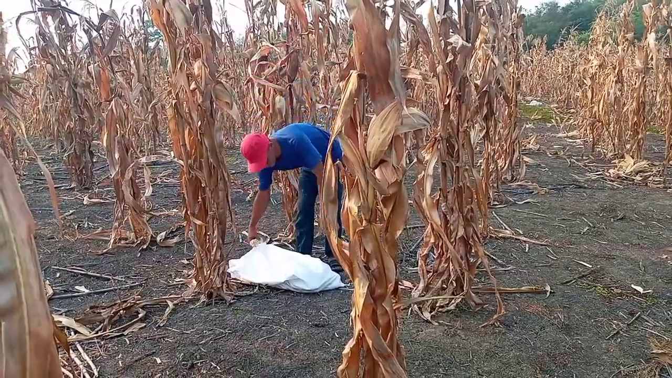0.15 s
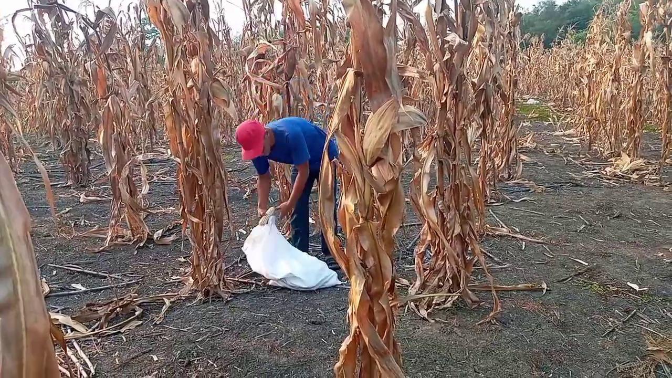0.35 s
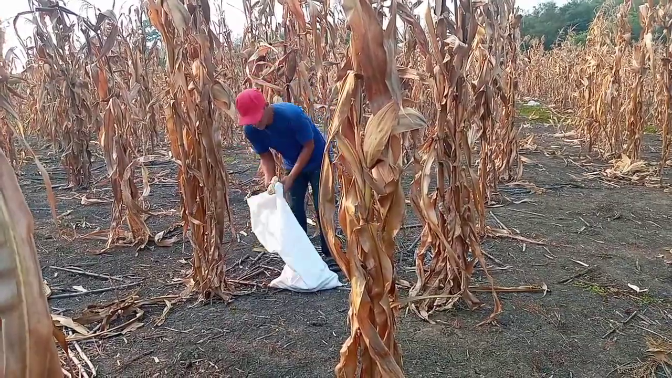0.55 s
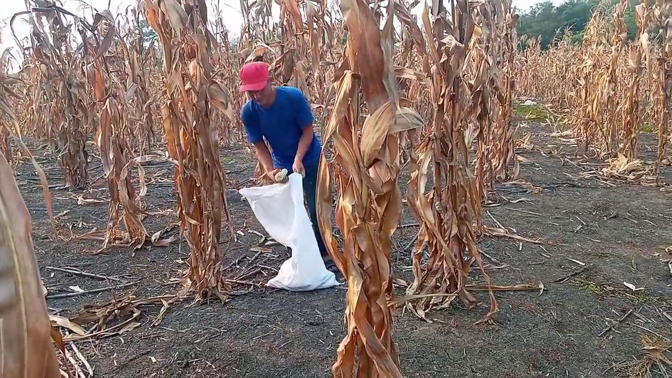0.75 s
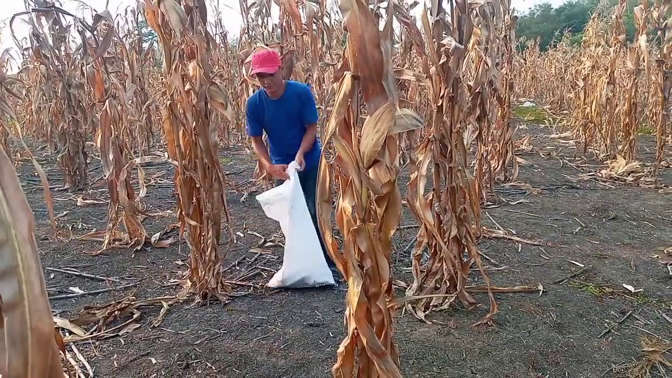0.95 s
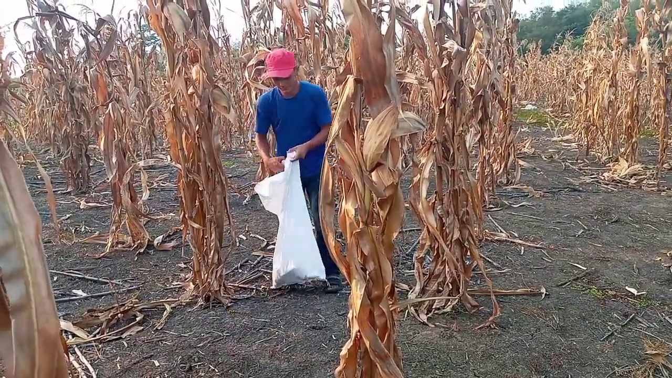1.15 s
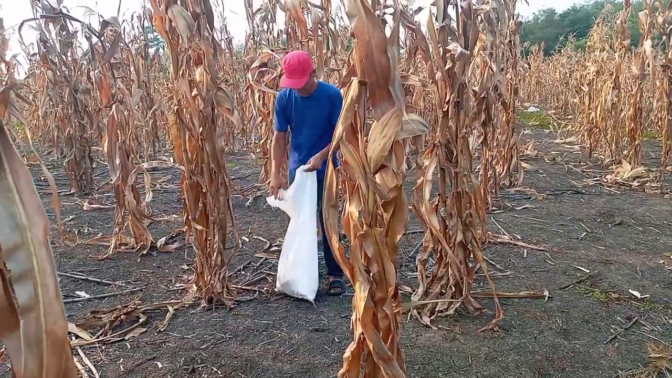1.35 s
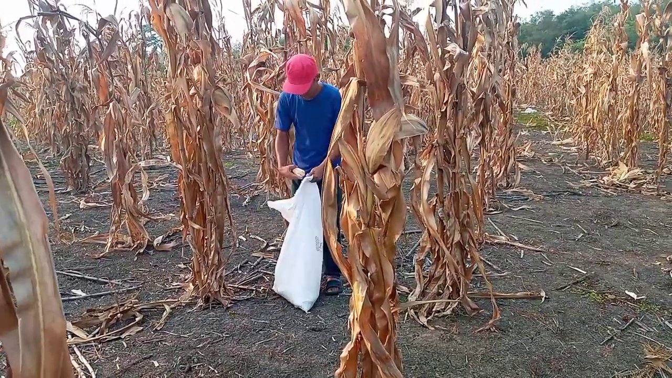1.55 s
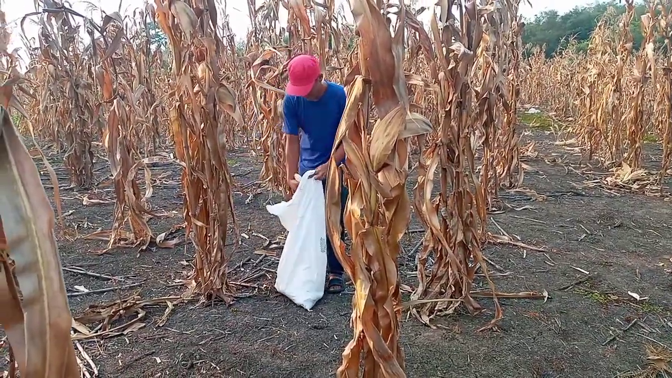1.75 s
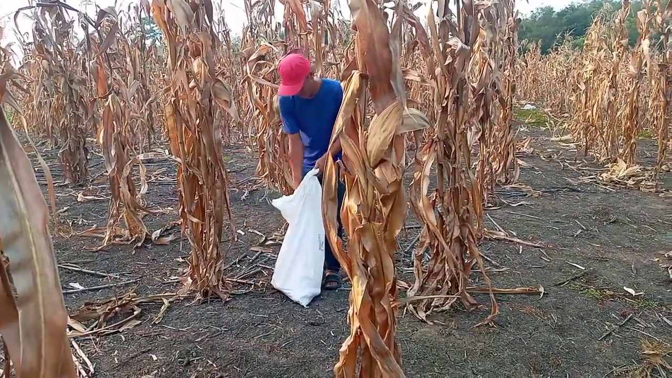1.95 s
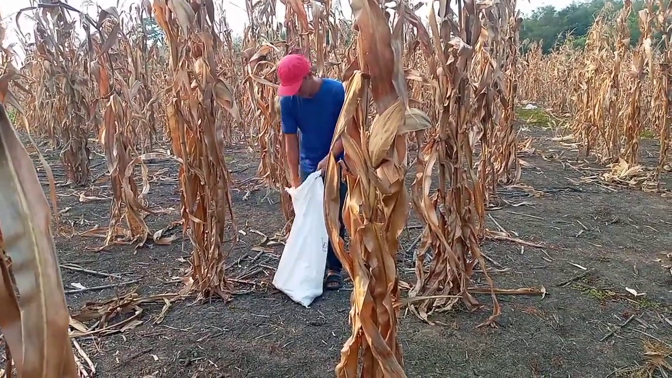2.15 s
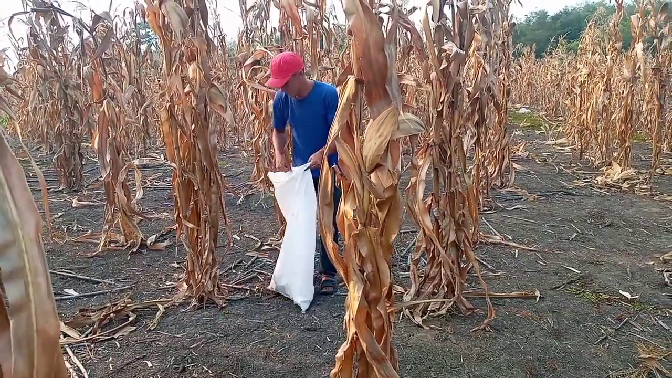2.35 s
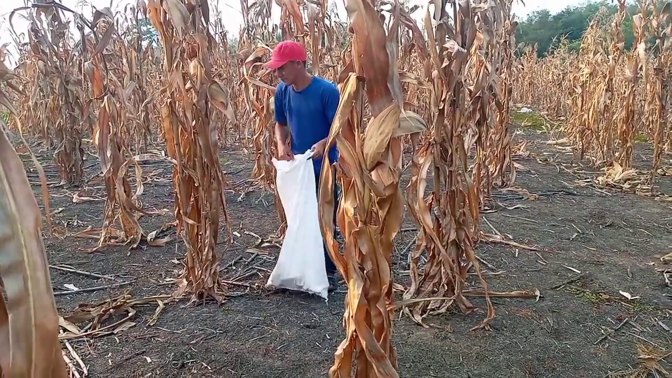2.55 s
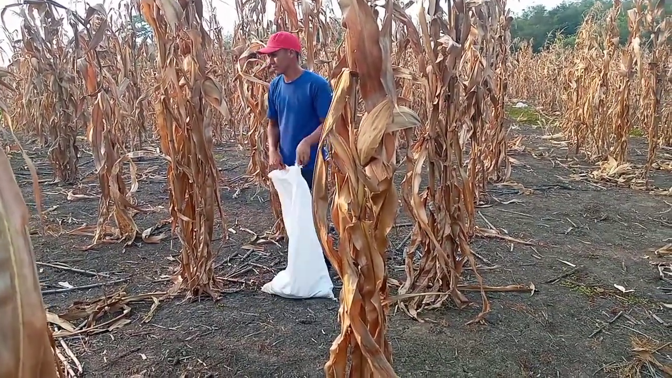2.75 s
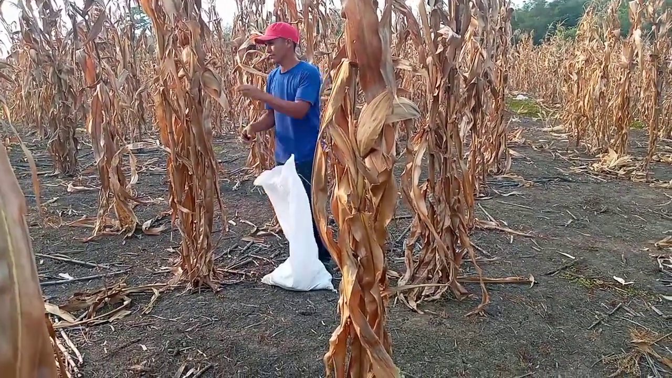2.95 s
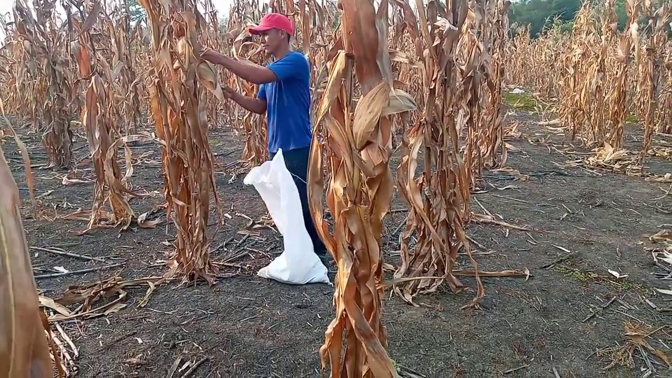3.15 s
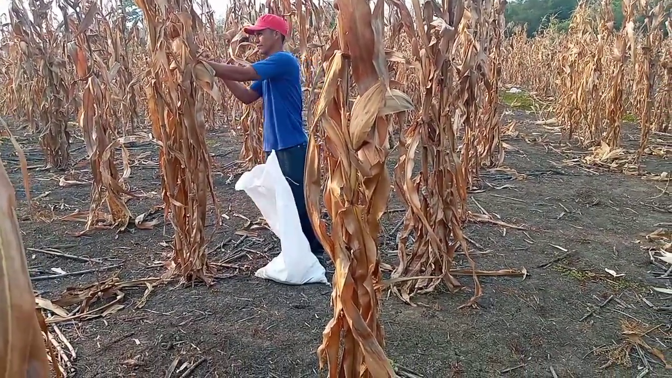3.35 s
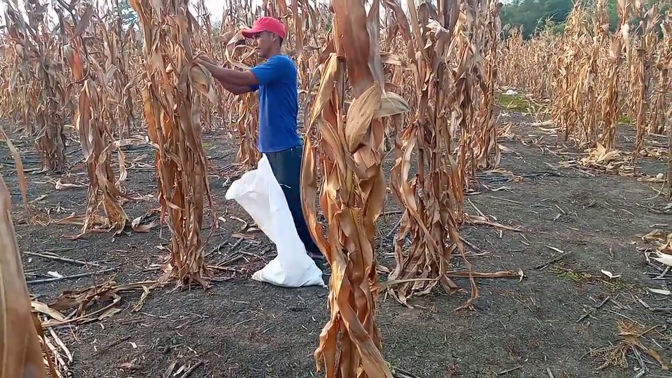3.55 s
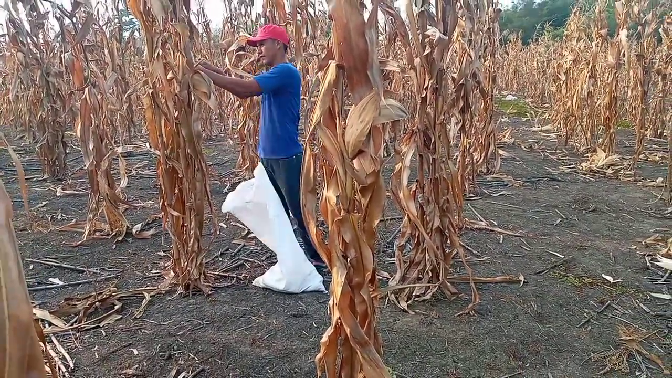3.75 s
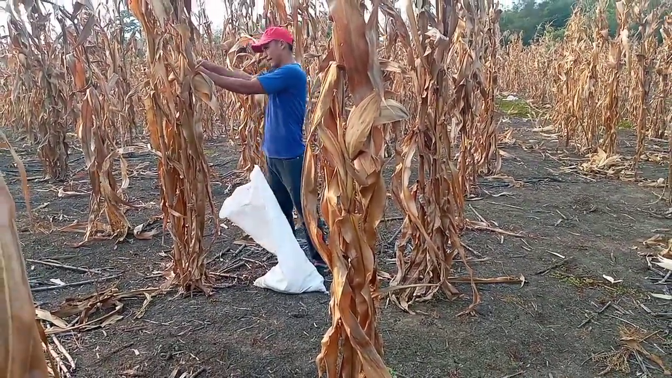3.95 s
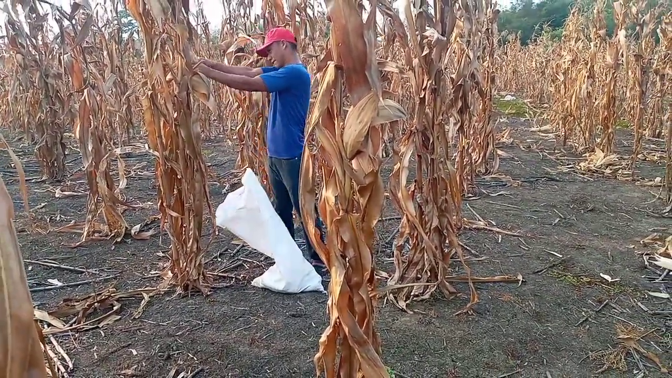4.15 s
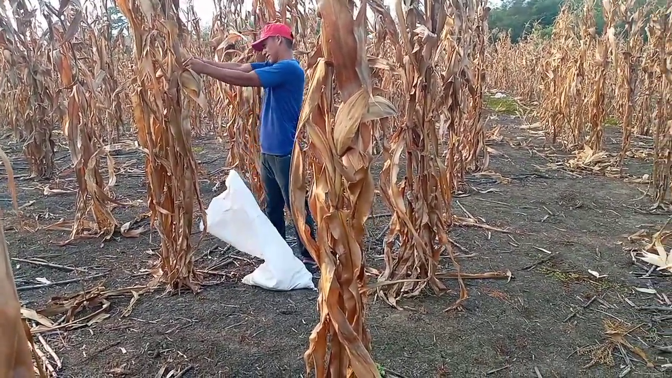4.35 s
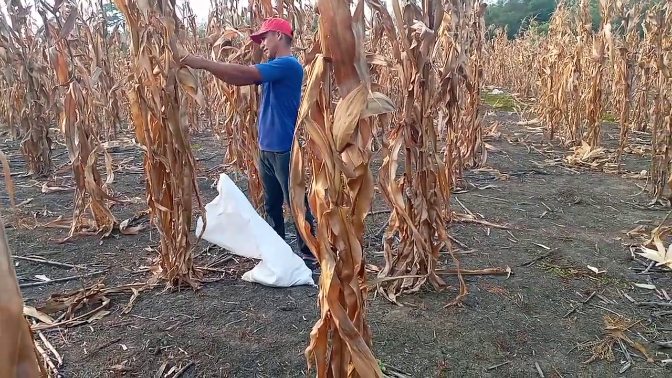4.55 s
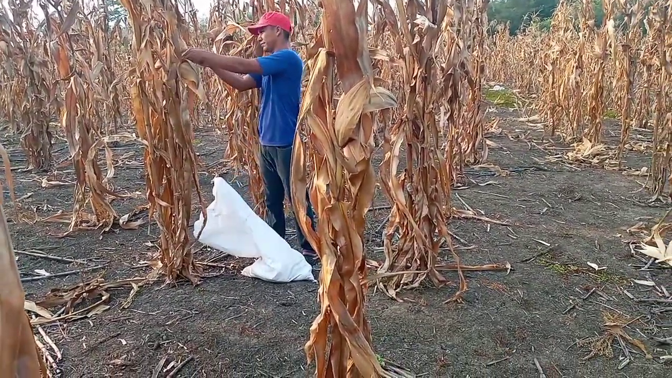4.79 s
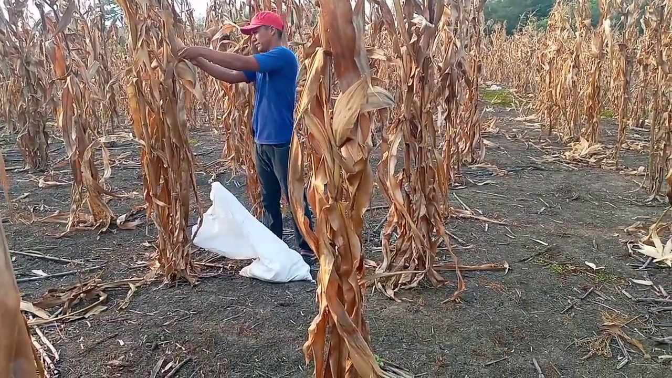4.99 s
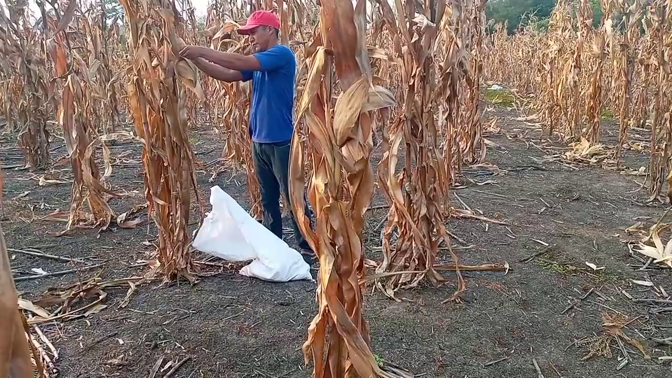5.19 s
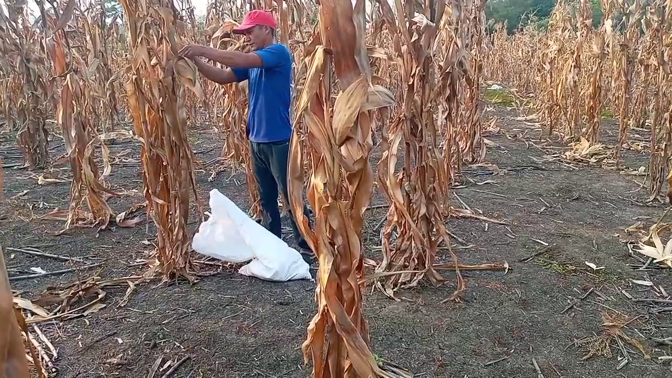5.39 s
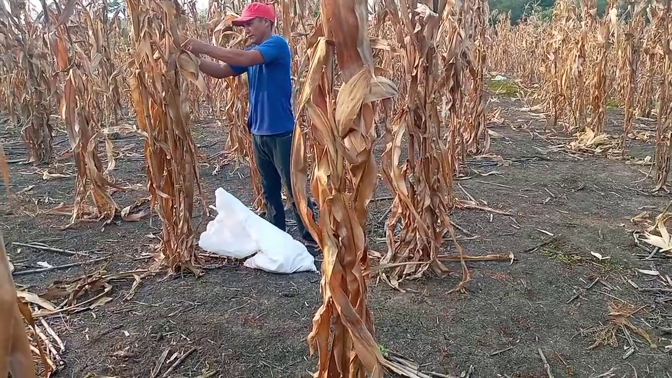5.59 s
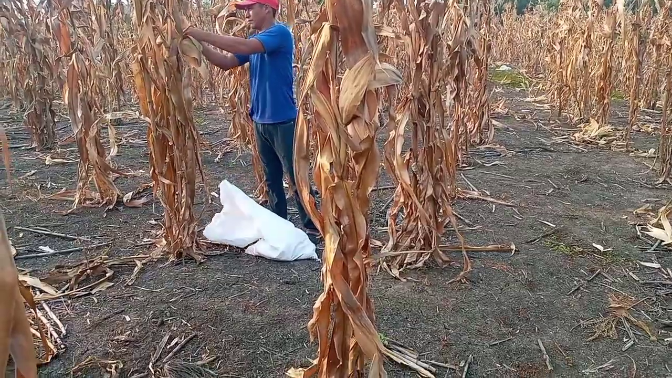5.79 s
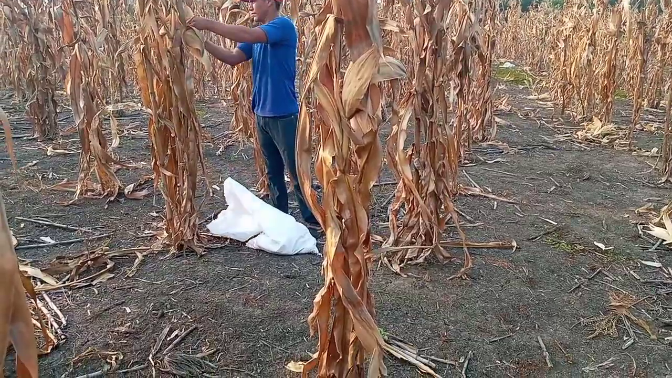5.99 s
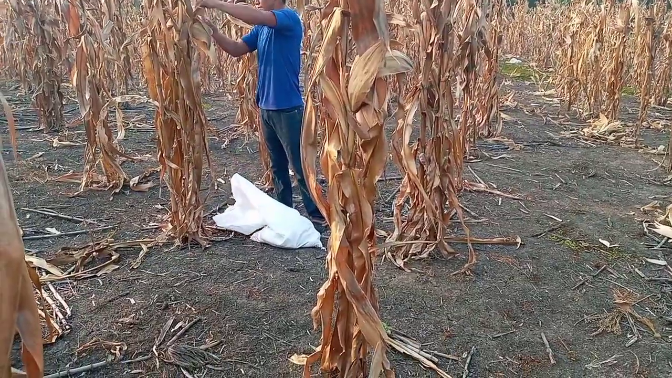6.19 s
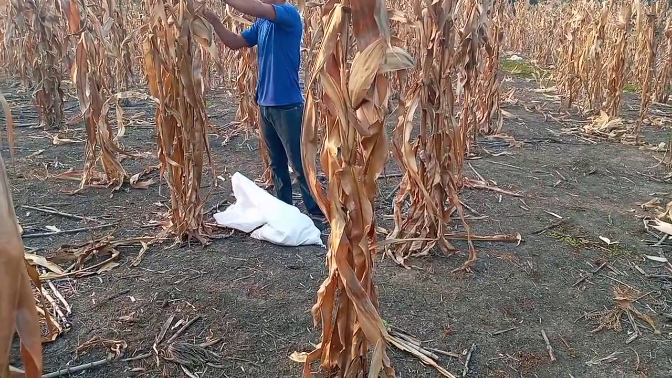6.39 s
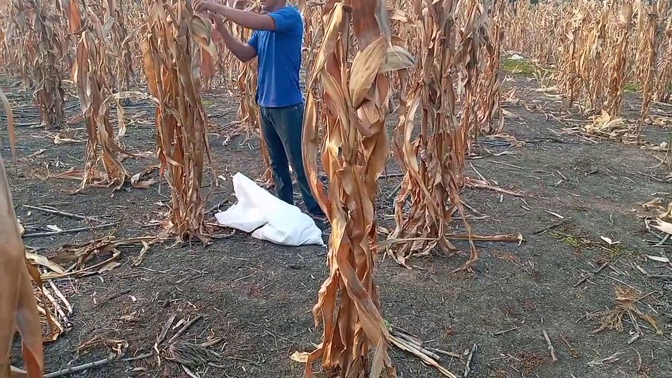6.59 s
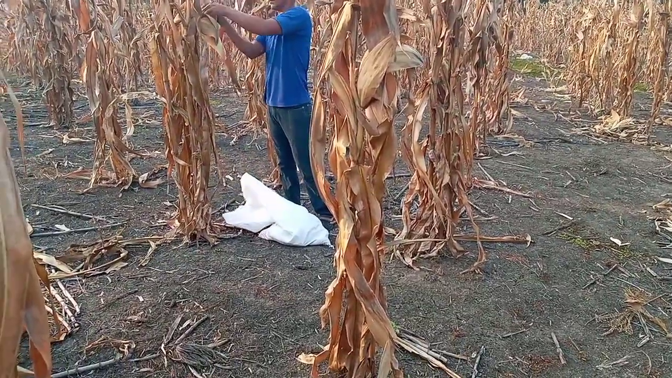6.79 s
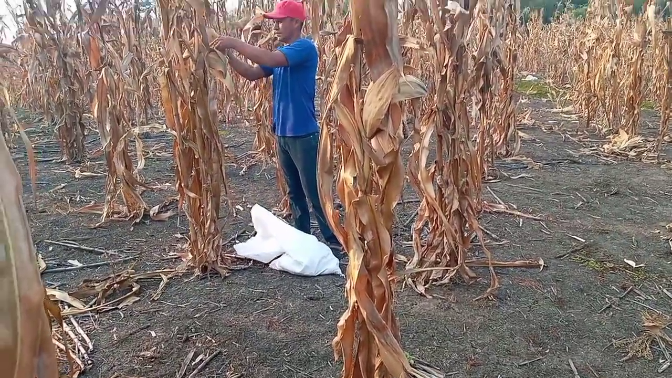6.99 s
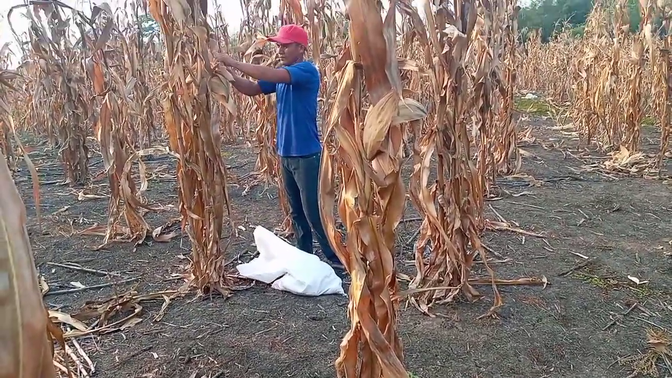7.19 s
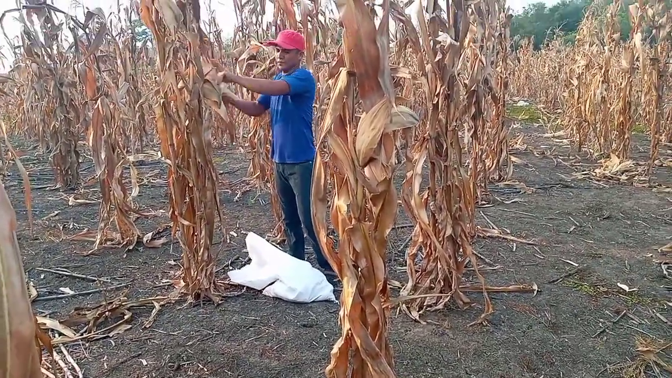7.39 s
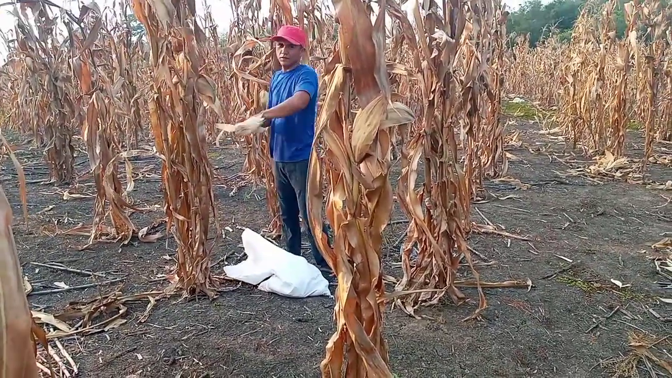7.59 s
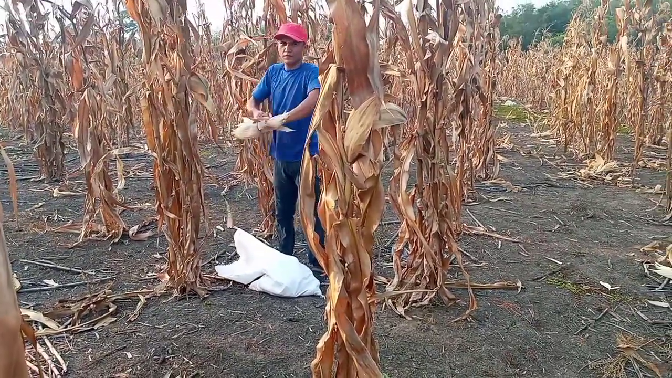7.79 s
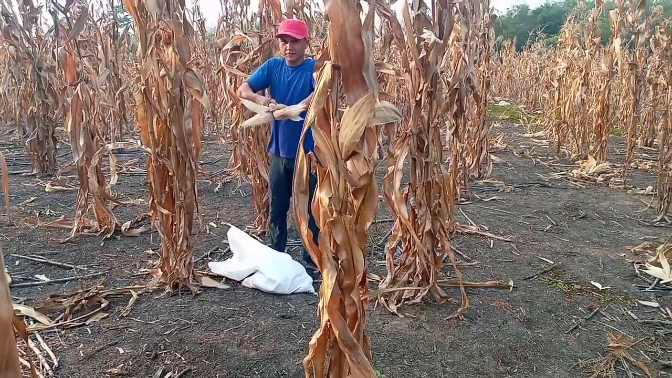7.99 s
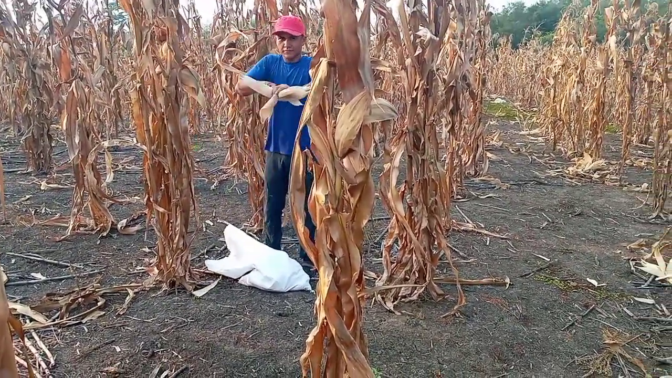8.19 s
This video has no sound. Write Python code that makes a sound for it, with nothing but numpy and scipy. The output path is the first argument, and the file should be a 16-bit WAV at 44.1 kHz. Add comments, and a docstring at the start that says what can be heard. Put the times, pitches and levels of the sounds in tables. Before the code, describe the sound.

After a dry thud on litter, a plastic sack rustles and flicks, then brittle corn husks are peeled with dense crackling and sharp snaps.

```python
"""An ear of dry maize is husked on its stalk and broken off: the husk crackles as countless tiny fractures and
snaps along its ribs. Before that an ear lands on the ground and a woven plastic sack is lifted and shaken: its
tapes slide, its folds crumple and its cloth flaps. Ears give dull bumps, and while husked the ear knocks in its
stalk. Filtered noise and random impulses make the fractures, rubbing and air; bumps are short unsteady tones.
Standing stalks scatter all but the faint moving air on the way to two spaced microphones."""
import sys
import numpy as np
from scipy import signal
from scipy.fft import rfft, irfft, next_fast_len
from scipy.io import wavfile
from scipy.ndimage import uniform_filter1d, map_coordinates

SR = 44100
rng = np.random.default_rng(int(sys.argv[2]) if len(sys.argv) > 2 else 0)


def output_pcm(signal):
    """Save a mono or channel-first signal as 16-bit PCM at the path in sys.argv[1].

    Samples are clipped to [-1, 1] before scaling.
    """
    pcm = np.clip(np.atleast_2d(signal).T, -1, 1) * 32767
    wavfile.write(sys.argv[1], SR, np.round(pcm).astype(np.int16))


N = 363214  # samples

# Spectrum of moving air and far leaves: (frequency [Hz], relative density [dB])
AIR_SPECTRUM = [(20, -43), (50, -5), (100, -1.5), (200, -11), (600, -15), (1400, -18.5), (2600, -15),
                (4000, -7), (6500, -6.5), (9000, -15.5), (11000, -6.5), (16000, -25)]

# An ear striking dry litter: (time [s], relative level [dB], decay time T60 [s], brushing before the blow [dB re blow])
LANDINGS = [(.1848, -14, 0.024, -7), (0.2175, -12.5, 0.032, -17)]
# Spectrum of the litter: (frequency [Hz], relative density [dB])
LITTER_SPECTRUM = [(60, -38), (130, -21), (230, -10), (380, -4.5), (650, -5), (840, 6), (1020, -5),
                   (1750, -9), (2100, -6.5), (2450, -2.5), (2850, -9.5), (4600, -6.5), (7000, -12.5),
                   (16000, -27)]

# Dull bumps: ears striking the ground, the sack or each other, and during the husking the ear knocking in its
# stalk: (time [s], approximate peak before filtering [dB], pitch [Hz])
EAR_BUMPS = [(0.187, -37, 139), (0.221, -54, 323), (0.872, -39.5, 163), (0.905, -45, 150),
             (0.965, -42, 137), (0.995, -45, 139), (1.361, -45, 151), (1.385, -39, 118),
             (2.169, -25.5, 150), (2.18, -34, 309), (2.595, -36, 193), (2.636, -46, 252), (2.825, -49, 202),
             (4.774, -40.5, 280), (5.321, -46, 383), (5.433, -32, 348), (6.122, -44, 296), (7.09, -34, 254),
             (7.932, -37, 240), (8.188, -37, 296)]

# The weave sliding over itself: (time [s], swish level [dB])
WEAVE_SLIDING = [(.27, -44), (.62, -43), (1.13, -38), (1.22, -48), (1.29, -39.5), (1.39, -40), (1.47, -48),
                 (1.67, -40.5), (1.87, -44), (2.14, -41), (2.33, -37.5), (2.43, -56), (2.53, -55),
                 (2.56, -34.5), (2.67, -39), (2.88, -51.5)]
# Tugs at the sack: (start [s], length [s], crumpling folds [dB], flapping cloth [dB], papery pleats [dB])
SACK_TUGS = [(0.349, 0.04, -56, -55, -54), (0.43, 0.082, -53, -57.5, -49.5), (0.543, 0.15, -62, -63, -52.5),
             (0.783, 0.13, -46.5, -50, -45), (0.947, 0.078, -54, -65, -43.5),
             (1.028, 0.14, -56.5, -69, -46.5), (1.266, 0.14, -53.5, -54.5, -69),
             (1.49, 0.076, -56, -54, -64), (1.64, 0.19, -59.5, -71, -51.5), (1.885, 0.1, -46.5, -64, -45.5),
             (2, 0.093, -41.5, -62, -43.5), (2.083, 0.12, -44, -42.5, -47), (2.22, 0.11, -50, -44.5, -52),
             (2.562, 0.11, -47.5, -45.5, -60)]
# Creases flicking over: (time [s], tape level [dB], relative fold level [dB], pleat level [dB])
CREASE_FLICKS = [(0.4933, -54, -46, -40), (0.862, -51, -45, -54), (1.263, -28, -56, -60),
                 (2.103, -40, -47, -36), (2.165, -33, -45, -52), (2.5941, -34, -32.5, -54),
                 (2.784, -45, -58, -74), (2.878, -35, -66, -42.5)]
# Spectra of the sliding tapes, folds, pleats and loose cloth: (frequency [Hz], relative density [dB])
WEAVE_SPECTRUM = [(800, -26), (1600, -7.5), (2500, -4.5), (4000, 0.5), (6500, -1), (8200, -8.5),
                  (11000, -5.5), (16000, -0.5)]
FOLD_SPECTRUM = [(250, -24), (400, 0.5), (620, -5), (900, 8), (1250, -7.5), (1800, -4.5), (2500, -15.5),
                 (6000, -44)]
PLEAT_SPECTRUM = [(1000, -32), (1600, -15.5), (1930, -1.5), (2400, -1.5), (3000, -4.5), (3600, -11),
                  (6000, -15)]
CLOTH_SPECTRUM = [(30, -49), (70, -6.5), (140, -2.5), (220, 1.5), (320, -5), (500, 0), (900, -59)]
TUG_ATTACK_S, TUG_RELEASE_S = 0.011, 0.022  # time constants
SLIDE_FOLDS_DB, SLIDE_FLAP_DB = -24, -20  # folds and cloth stirred by sliding, re swish
GROUND_MS, GROUND_SHARE, GROUND_HZ = 1.616, 0.29, 3550  # soil echo: delay, strength, upper edge

# Hands holding the husk: (time [s], crackle level [dB], hollow body level [dB])
HUSK_GRIP = [(3.15, -81, -76), (3.189, -45, -46.5), (3.699, -42, -46.5), (4.03, -43.5, -52),
             (4.3, -40.5, -46.5), (4.58, -42, -45), (4.68, -43, -60), (5.15, -42.5, -44.5),
             (5.29, -46.5, -53), (5.36, -43, -46), (5.82, -40, -49), (6.35, -41, -48.5), (6.95, -39, -47.5),
             (7.48, -38, -46.5), (7.57, -43.5, -59.5), (7.72, -42.5, -49), (7.81, -42, -54),
             (8.2, -38.5, -53)]
# Pulls that peel the husk and twist the ear: (start [s], length [s], crackle level [dB], hollow body level [dB])
HUSK_PULLS = [(3.217, 0.12, -44.5, -42.5), (3.378, 0.07, -46, -47), (3.494, 0.19, -38.5, -46.5),
              (3.823, 0.095, -39.5, -40), (4.066, 0.15, -35, -41), (4.426, 0.11, -42, -40),
              (4.734, 0.22, -40, -41), (5.057, 0.048, -35.5, -37.5), (5.396, 0.092, -36, -35),
              (5.601, 0.11, -38.5, -34), (5.918, 0.32, -39, -37.5), (5.994, 0.31, -32.5, -41),
              (6.347, 0.237, -36, -43), (6.58, 0.29, -61, -46), (7.082, 0.14, -34.5, -40.5),
              (7.277, 0.15, -32.5, -40), (7.586, 0.11, -41.5, -47), (7.98, 0.084, -41.5, -45.5),
              (8.087, 0.087, -37, -42)]
# Ribs and stalk fibres snapping, from faint ticks to loud cracks: (time [s], leaf level [dB], hollow body level [dB],
# fine splinter level [dB], straining before [dB re snap], decay time T60 [s], pitch of the hollow [Hz])
RIB_SNAPS = [(3.275, -36, -37, -45, -20, 0.032, 800), (3.3063, -25, -39, -36, -11, 0.031, 1070),
             (3.3618, -46, -37.5, -43, -13, 0.029, 710), (3.4265, -36, -29.5, -46, -8, 0.034, 675),
             (3.487, -25, -37, -48, -22, 0.047, 1030), (3.563, -24.5, -36, -42, -1, 0.018, 1040),
             (3.5973, -29, -51, -20.5, -31.0, 0.023, 930.0), (3.646, -27, -35, -28, -11, 0.087, 677),
             (3.666, -27.5, -33, -26.5, -28, 0.033, 1090), (3.6804, -29, -33.5, -32, -33, 0.067, 650),
             (3.839, -28.5, -38, -29.5, -5.5, 0.12, 745), (3.8916, -18.5, -27, -49, -11, 0.036, 1010),
             (3.908, -31, -41, -34, -2, 0.014, 1000), (3.9902, -26.5, -40.5, -30.5, 1, 0.033, 684),
             (4.0512, -29, -41, -35, -22, 0.027, 900), (4.078, -23.5, -30, -24, -7, 0.032, 794),
             (4.1258, -23.5, -33, -27, 0.5, 0.12, 797), (4.15, -25, -32, -24, -12, 0.032, 1090),
             (4.1849, -26, -32.5, -24.5, 0.5, 0.039, 676), (4.2005, -25, -29.5, -23, -2, 0.015, 690),
             (4.281, -28, -46, -33, -19, 0.029, 700.0), (4.2927, -25, -33.5, -25, -3, 0.051, 730),
             (4.4378, -28, -35, -43, -24, 0.016, 775), (4.462, -38, -33, -45, -12, 0.022, 770),
             (4.6115, -27.5, -30, -44, -3.5, 0.025, 740), (4.6294, -37, -56, -36, -22, 0.016, 900),
             (4.776, -30, -34, -35, -1, 0.13, 762), (4.8845, -35, -38, -28, -14, 0.031, 910),
             (4.9145, -20, -31, -26, -6, 0.024, 675), (4.9651, -17.5, -38, -22, -25, 0.028, 990),
             (5.045, -23, -34, -22.5, -34, 0.037, 820.0), (5.1991, -32.5, -39, -54, 0, 0.021, 930),
             (5.322, -27.5, -25, -20.5, -30, 0.007, 676), (5.3362, -25, -54, -26.5, -5, 0.032, 676),
             (5.368, -28.5, -40, -32, -3, 0.11, 734), (5.4208, -27, -34, -23, -34, 0.035, 816),
             (5.4346, -25, -23, -20, -22, 0.071, 800), (5.547, -28, -37.5, -51, -9, 0.036, 610.0),
             (5.6117, -20.5, -26.5, -49, -18, 0.11, 715), (5.7185, -23, -45, -50.0, -1, 0.026, 720),
             (5.8583, -24.5, -32, -31, -6, 0.069, 940.0), (5.9136, -28, -29.5, -34, -2.5, 0.067, 666),
             (5.9449, -25, -42, -16, -22, 0.078, 794), (6.0016, -22, -23.5, -19.5, -20, 0.043, 1040),
             (6.1061, -22, -23, -22, -30, 0.022, 646), (6.1204, -17.5, -28, -22, -32, 0.12, 710),
             (6.1494, -26, -41, -27, -20, 0.02, 900), (6.2055, -18, -24, -22, 1, 0.019, 685),
             (6.248, -25, -50, -23, -20, 0.037, 1220.0), (6.292, -27, -44.5, -25.5, 7.5, 0.034, 684),
             (6.5022, -25.5, -34.5, -22.5, 0.5, 0.06, 710), (6.5578, -30, -50, -19, -34.0, 0.019, 640.0),
             (6.693, -30.5, -61, -27, -32.0, 0.064, 1010.0), (6.8283, -34, -42, -30, -1, 0.18, 970),
             (7.0661, -19.5, -40, -27, -29, 0.022, 970), (7.093, -20, -23, -19.5, -8, 0.098, 890),
             (7.1365, -23, -31.5, -24.0, 5, 0.066, 704), (7.148, -16, -32.5, -20, -6, 0.047, 745),
             (7.1697, -19, -31, -23, -5, 0.032, 730), (7.217, -20, -47, -42, -20, 0.025, 900.0),
             (7.3218, -26.5, -45, -20.5, 5, 0.15, 824), (7.4153, -21, -39, -36, -28, 0.064, 700),
             (7.6432, -26, -40.5, -29, 2.5, 0.12, 860), (7.6739, -32, -37, -26, 3, 0.11, 850),
             (7.7115, -26, -51, -32, -4, 0.055, 800), (7.753, -20.5, -60, -22, -26.5, 0.04, 1100.0),
             (7.834, -27, -55, -32.5, -32.5, 0.026, 1210.0), (7.939, -35, -33.5, -27, -2.5, 0.036, 1220),
             (7.9778, -30, -30.5, -44, -24, 0.09, 1120), (7.9927, -19, -28.5, -43, -4, 0.024, 1180),
             (8.021, -20.5, -39, -21.5, -3, 0.056, 1180), (8.038, -25, -42, -21.5, 0, 0.049, 990),
             (8.171, -29, -37, -26, -18, 0.097, 1000), (8.1936, -31, -30, -34, -11, 0.019, 930)]
# Spectrum of the husk: (frequency [Hz], relative density [dB])
HUSK_SPECTRUM = [(60, -39), (160, -26.5), (260, -10), (350, -5), (700, 0), (950, -2.5), (1700, -2.5),
                 (2500, 3.5), (4000, 2.5), (6500, -5.5), (8200, -14), (11000, -13), (16000, -7)]
PULL_ATTACK_S, PULL_RELEASE_S = 0.0072, 0.019  # time constants
REFERENCE_DB = -53.5  # crackle level at which SPLINTER_DB applies
SPLINTER_DB, SPLINTER_GROWS = 1.5, 1.187  # splinters re leaf at that level; their dB per dB of crackle
TEAR_RISE = 0.013  # opening time of a snap, as a share of its T60, at full strain
RIB_HZ, RIB_OCTAVE_DB = 2650, 2  # rib pitch; splinter excess that raises it an octave
CRACK_S = 0.0011  # time constant of the first crack of a break

# Sound scattered by the stalks: (frequency [Hz], share of energy [0-1])
SCATTERED_SHARE = [(200, 0.05), (800, 0.26), (1600, 0.52), (3000, 0.66), (7000, 0.97)]
# Excess of the left microphone over the right: (frequency [Hz], level difference [dB])
LEFT_EXCESS = [(60, 0), (380, 7), (650, -1.5), (800, 1), (1000, 8.5), (1450, 1.5), (1800, 9.5), (2300, 7.5),
               (6500, 6.5), (8200, 14), (11300, -7), (14000, 0)]
# Resonances and hollows of the microphone housing: (frequency [Hz], width [Hz], gain [dB])
HOUSING_MODES = [(508, 135, -6), (730, 75, 1.5), (1600, 160, 2.5), (1640, 3100, -3), (1836, 71, 3.5),
                 (2102, 81, -5), (2580, 260, 2), (2787, 66, -7), (14330, 3100, -12), (14800, 990, 9)]
TOP_HZ = 16000  # band limit


def amp(db):
    """Decibels are twenty times the logarithm of amplitude; this inverts them."""
    return 10 ** (np.asarray(db) / 20)


def decibels(gain):
    """The level of a gain is logarithmic; a small floor keeps it finite."""
    return 20 * np.log10(gain + 1e-9)


def unit(x):
    """Normalization divides a signal by its root mean square."""
    return x / np.sqrt(np.mean(x ** 2) + 1e-20)


def along(points, hz):
    """Interpolation over the logarithm of frequency joins (frequency [Hz], value) points."""
    f, v = np.transpose(points)
    return np.interp(np.log(hz + 1), np.log(f + 1), v)


def colour(points):
    """A spectrum given in (frequency [Hz], level [dB]) points acts as a gain over frequency."""
    return lambda hz: amp(along(points, hz))


def wobble(rate):
    """Interpolated random knots, rate [1/s], make a slow smooth fluctuation."""
    return map_coordinates(rng.standard_normal(int(N * rate / SR) + 4), [np.arange(N) * rate / SR])


def filtered(x, response):
    """Linear filtering multiplies the spectrum by a response of frequency."""
    size = next_fast_len(N + SR // 4)
    return irfft(rfft(x, size) * response(np.fft.rfftfreq(size, 1 / SR)), size)[..., :N]


def ring(x, gain, size=2048):
    """Minimum-phase filtering gives a causal pulse of unit energy with the spectral shape of gain."""
    cepstrum = irfft(np.log(np.maximum(gain(np.fft.rfftfreq(size, 1 / SR)), 1e-6)))
    # folding the cepstrum onto positive time makes the phase minimal
    cepstrum[1:size // 2] *= 2
    cepstrum[size // 2 + 1:] = 0
    pulse = irfft(np.exp(rfft(cepstrum)))
    return signal.oaconvolve(x, pulse / np.linalg.norm(pulse))[:N]


def add(track, s, sound):
    """Superposition mixes a sound into a track at s seconds."""
    start = max(round(s * SR), 0)
    track[start:start + len(sound)] += sound[:N - start]


def air():
    """Partial coherence: each microphone hears its own air noise plus a weaker shared part."""
    own = rng.standard_normal((2, N))
    shared = 0.23 * rng.standard_normal(N)
    gain = amp(-51.0 + 2.8 * wobble(2.2))
    return gain * unit(filtered(own + shared, colour(AIR_SPECTRUM)))


def strain(rise):
    """Progressive failure: fibres give way ever louder in the 40 ms before a break."""
    t = np.arange(-SR // 25, 0) / SR
    hold = 1 - np.exp(t / 0.002)  # the last fibres hold for an instant
    fibres = rng.standard_normal(len(t)) * amp(4.5 * rng.standard_normal(len(t)))
    return hold * np.exp(t / rise) * fibres


def burst(t60, rise, after_db, after_t60, crack):
    """Avalanche fracture: a first crack, a fast-dying run of fractures, then fibres settling."""
    t = np.arange(SR // 5) / SR
    t60 = max(t60, 0.008)
    opening = 1 - np.exp(-t / (rise * t60))  # a long tear also takes longer to get going
    decay = amp(-60 * t / t60) + amp(after_db - 60 * t / after_t60)
    fractures = rng.standard_normal(len(t)) * amp(4.2 * rng.standard_normal(len(t)))
    sound = opening * decay * fractures
    sound /= np.sqrt(np.mean(sound[:SR // 200] ** 2))  # unit rms over the first 5 ms
    return sound + crack * np.exp(-t / CRACK_S) * rng.standard_normal(len(t))


def landing():
    """Impact on loose matter: an ear brushes through the litter, strikes and topples over."""
    blows = np.zeros(N)
    for s, db, t60, brush_db in LANDINGS:
        brush = amp(brush_db) * strain(rise=0.014)
        strike = burst(t60, rise=0.0067, after_db=-10, after_t60=0.12, crack=0.56)
        blow = np.concatenate([brush, strike])
        add(blows, s - len(brush) / SR, amp(db - 6.5) * blow)
    return ring(blows, colour(LITTER_SPECTRUM))


def bumps():
    """Heavily damped oscillation: a dull, uneven knock swells and soon dies."""
    out, t = np.zeros(N), np.arange(SR // 5) / SR
    age = t / 0.0041
    for s, db, hz in EAR_BUMPS:
        drift = 0.042 * np.cumsum(rng.standard_normal(len(t)))  # random walk of phase
        swell = age ** 2 * np.exp(-age)
        add(out, s, amp(db + 5.0) * swell * np.sin(2 * np.pi * hz * t + drift))
    return signal.sosfilt(signal.butter(2, 85, "high", fs=SR, output="sos"), out)


def crackle(rate, spread_db, rub):
    """Random fractures: unequal impulses, rate [1/s], over the hiss of rubbing; rms 1."""
    sizes = amp(spread_db * np.clip(rng.standard_normal(N), -2.5, 2.5))
    clicks = (rng.random(N) < rate / SR) * sizes * rng.choice([-1, 1], N)
    return unit(unit(clicks) + rub * rng.standard_normal(N))


def clumps(rate, t60, steady):
    """Clustered failure: clumps of fractures start at once and decay exponentially; rms 1."""
    starts = (rng.random(N) < rate / SR) * np.minimum(rng.exponential(size=N), 2)
    return unit(steady + signal.lfilter([1], [1, -amp(-60 / (t60 * SR))], starts))


def level(rows):
    """A level envelope joins (time [s], level [dB]) points, with silence beyond 20 ms outside them."""
    s, db = np.transpose(rows)
    t = np.arange(N) / SR
    return amp(np.interp(t, s, db)) * ((t >= s[0] - 0.02) & (t <= s[-1] + 0.02))


def strokes(table, column, attack, release):
    """Energy addition of hand movements, each building up, holding and letting go exponentially."""
    age = np.arange(N)[:2 * SR] / SR
    power = np.zeros(N)
    for row in table:
        s, length = row[:2]
        build = 1 - np.exp(-age / attack)
        let_go = np.exp(-np.maximum(age - length, 0) / release)
        add(power, s, (amp(row[column]) * build * let_go) ** 2)
    return np.sqrt(power)


def shifting(x, depth_db, order=12, size=16):
    """Bending changes a sheet's radiation: patches of gain drift over frequency and time."""
    z = signal.stft(x, nperseg=512)[2]
    field = rng.standard_normal(z.shape)
    for _ in range(2):
        field = uniform_filter1d(field, order // 2, 0)  # over frequency
        field = uniform_filter1d(field, size, 1)  # over time
    return signal.istft(z * amp(depth_db * unit(field)), nperseg=512)[1][:N]


def sack():
    """Friction and buckling: plastic tapes slide, folds and pleats crumple, loose cloth flaps."""
    swish = level(WEAVE_SLIDING)
    folds, flap, bend = [strokes(SACK_TUGS, column, TUG_ATTACK_S, TUG_RELEASE_S) for column in (2, 3, 4)]
    crinkles = clumps(rate=55, t60=0.05, steady=1.1)
    pleats = bend * crinkles * crackle(rate=900, spread_db=-2.5, rub=1.0)
    tapes = swish * crackle(rate=5000, spread_db=2, rub=0.73)
    # any sliding also stirs the folds and the cloth a little
    fold_gain = np.hypot(folds, amp(SLIDE_FOLDS_DB) * swish)
    crumple = fold_gain * crackle(rate=650, spread_db=3.0, rub=1.0) * crinkles
    for s, db, fold_db, pleat_db in CREASE_FLICKS:
        flick = burst(t60=0.02, rise=0.004, after_db=-11, after_t60=0.1, crack=1.5)
        add(tapes, s, amp(db) * flick)
        add(crumple, s, amp(fold_db - 1.0) * flick)
        add(pleats, s, amp(pleat_db) * flick)
    flap_gain = np.hypot(flap, amp(SLIDE_FLAP_DB) * swish)
    cloth = flap_gain * crackle(rate=210, spread_db=0, rub=0.65)
    sheet = ring(crumple, colour(FOLD_SPECTRUM)) + ring(pleats, colour(PLEAT_SPECTRUM))
    sheet = shifting(sheet, depth_db=2.0)
    return ring(tapes, colour(WEAVE_SPECTRUM)) + sheet + ring(cloth, colour(CLOTH_SPECTRUM))


def ground(x):
    """Reflection: the soil returns a weaker, duller copy just after the direct sound."""
    def response(hz):
        delayed = np.exp(-2j * np.pi * hz * GROUND_MS / 1000)
        return 1 + GROUND_SHARE * delayed / (1 + (hz / GROUND_HZ) ** 4)
    return filtered(x, response)


def resonate(snap, hz, sharpness, dry, share):
    """Resonance: a snap excites the ring of a single mode, added to the snap itself."""
    rung = signal.lfilter(*signal.iirpeak(np.clip(hz, 100, SR / 4), max(sharpness, 1), SR), snap)
    return dry * snap + share * rung


def husk():
    """Brittle fracture sounds through the hollow sheath, the stiff leaf and its finest splinters."""
    grain = crackle(rate=1600, spread_db=2.5, rub=0.4) * clumps(rate=70, t60=0.02, steady=1.7)
    grip = level([(s, db) for s, db, _ in HUSK_GRIP])
    grip_body = level([(s, db) for s, _, db in HUSK_GRIP])
    pull, pull_body = [strokes(HUSK_PULLS, column, PULL_ATTACK_S, PULL_RELEASE_S) for column in (2, 3)]
    crackle_db = decibels(np.hypot(grip, pull))
    hollow_db = decibels(np.hypot(grip_body, pull_body))
    fine_db = REFERENCE_DB + SPLINTER_DB + SPLINTER_GROWS * (crackle_db - REFERENCE_DB)
    leaf, body, splinter = shifting(grain, depth_db=2.2) * amp([crackle_db, hollow_db, fine_db])
    for s, db, body_db, splinter_db, strain_db, t60, hollow_hz in RIB_SNAPS:
        before = amp(strain_db) * strain(rise=0.0098)
        rise = TEAR_RISE * amp(min(strain_db, 0))  # a snap that strains first also opens slowly
        snap = np.concatenate([before, burst(t60, rise, after_db=-22, after_t60=0.095, crack=1.6)])
        start = s - len(before) / SR
        # thinner ribs splinter more and ring higher
        rib_hz = RIB_HZ * 2 ** np.clip((splinter_db - db) / RIB_OCTAVE_DB, -0.6, 1)
        add(leaf, start, resonate(snap, rib_hz, sharpness=4.6, dry=0.57, share=0.22) * amp(db))
        add(body, start, resonate(snap, hollow_hz, sharpness=15.5, dry=0.86, share=1.89) * amp(body_db))
        add(splinter, start, snap * amp(splinter_db))
    tone = colour(HUSK_SPECTRUM)
    above = lambda hz, edge_hz: 1 - 1 / (1 + (hz / edge_hz) ** 8)
    low = ring(body, lambda hz: tone(hz) * np.sqrt(1 - above(hz, 1830)))
    middle = ring(leaf, lambda hz: tone(hz) * above(hz, 1370) * np.sqrt(1 - above(hz, 8100)))
    high = ring(splinter, lambda hz: tone(hz) * above(hz, 6870))
    return low + middle + high


def stalks(x, near_t60, lead_ms, count=1500):
    """Multiple scattering: each moment of sound takes new random paths; the right microphone leads."""
    t = np.arange(SR // 18) / SR
    hop = N // count + 1
    moments = np.pad(x, (0, count * hop - N)).reshape(count, hop)
    far_stalks = amp(-17 - 60 * t / 0.13)
    fade = amp(-60 * t / near_t60) + far_stalks
    echo = np.zeros((2, count * hop + len(t)))
    for side in echo:
        paths = fade / np.linalg.norm(fade) * rng.standard_normal((count, len(t)))
        for k, tail in enumerate(signal.fftconvolve(moments, paths, axes=1)):
            side[k * hop:k * hop + len(tail)] += tail
    share = lambda hz: np.clip(along(SCATTERED_SHARE, hz), 0, 1)
    direct = filtered(x, lambda hz: np.sqrt(1 - share(hz)))
    scattered = filtered(echo, lambda hz: np.sqrt(share(hz)))
    delay = np.array([[lead_ms], [-lead_ms]]) / 2000  # half the lead on each side [s]
    return filtered(direct + scattered, lambda hz: np.exp(-2j * np.pi * hz * delay))


def scene():
    """Superposition: sack and landing with a soil echo, bumps and husk without, all over the air."""
    low = stalks(ground(sack() + landing()) + bumps(), near_t60=0.008, lead_ms=1.005)
    high = stalks(husk(), near_t60=0.0036, lead_ms=1.058)
    return low + high + air()


def record(dry):
    """Reception: the housing and two microphone ports colour the sound below the band limit."""
    housing = lambda hz: sum(db * np.exp(-2 * ((hz - f) / width) ** 2) for f, width, db in HOUSING_MODES)
    halves = np.array([[0.5], [-0.5]])  # left and right share the level difference
    return filtered(dry, lambda hz: amp(housing(hz) + along(LEFT_EXCESS, hz) * halves) * (hz < TOP_HZ))


dry = scene()
out = record(dry)
output_pcm(out)
```